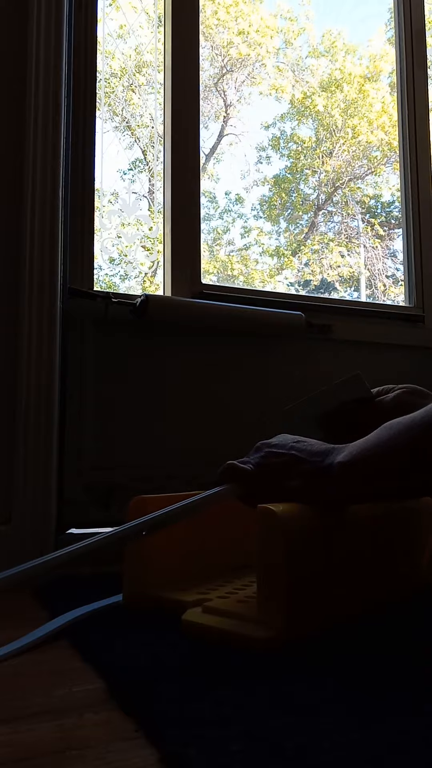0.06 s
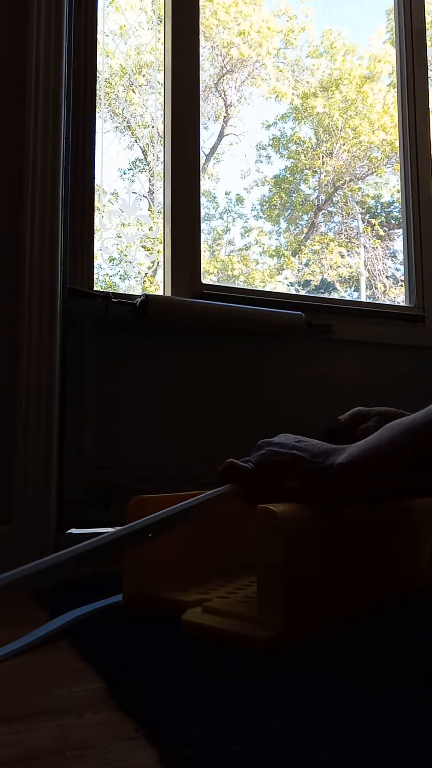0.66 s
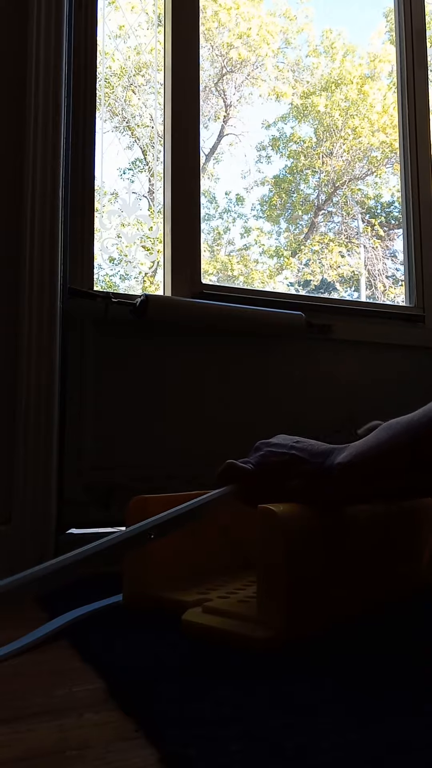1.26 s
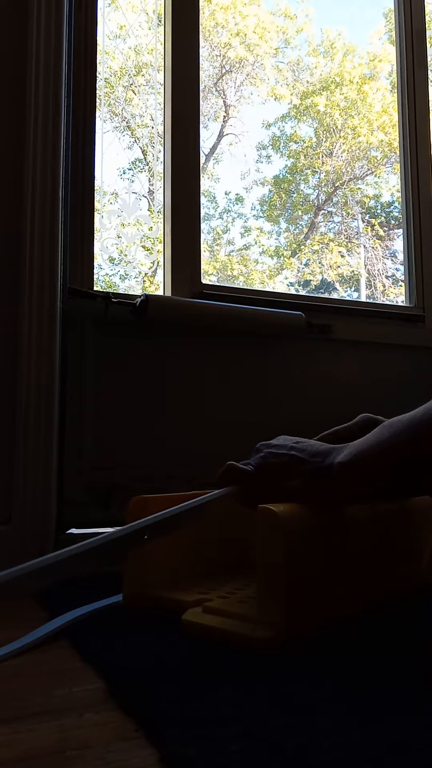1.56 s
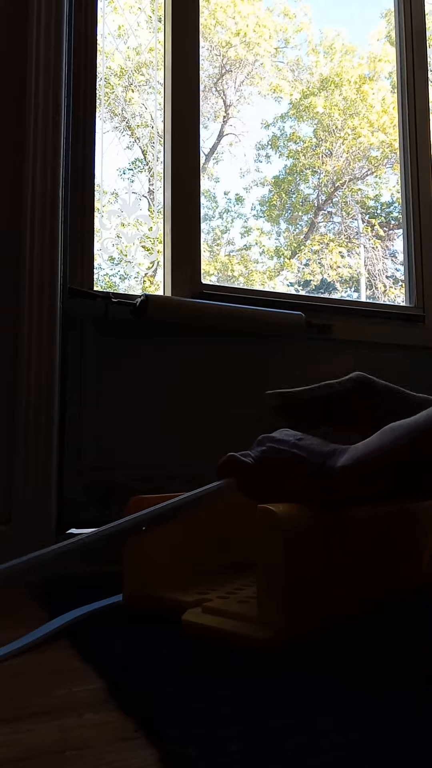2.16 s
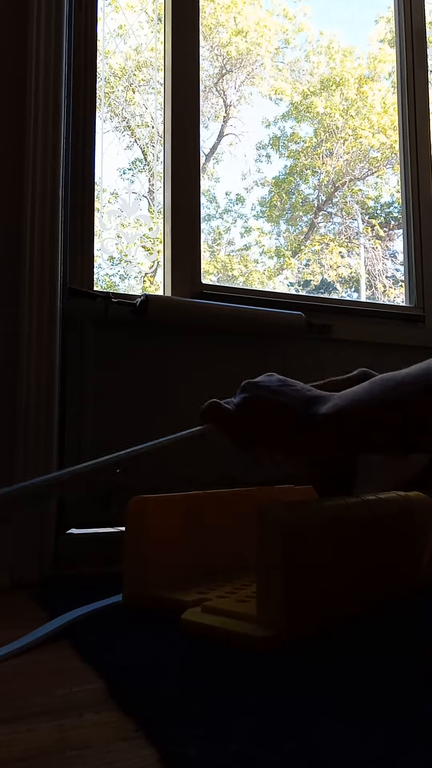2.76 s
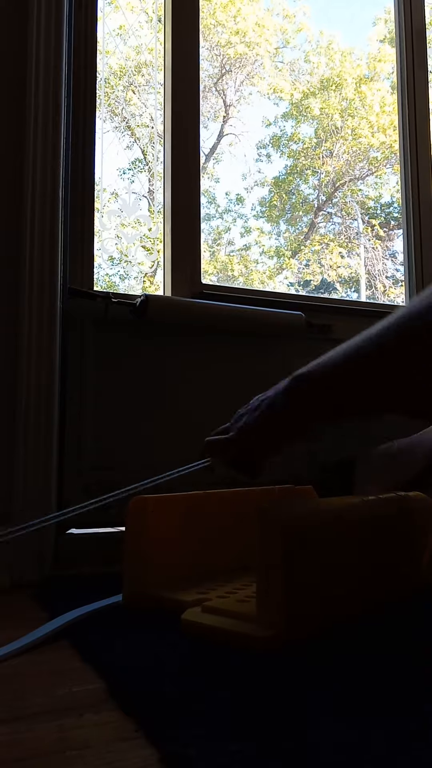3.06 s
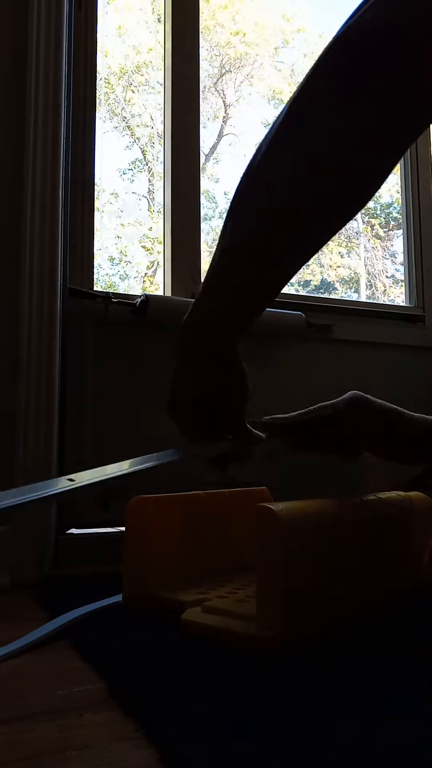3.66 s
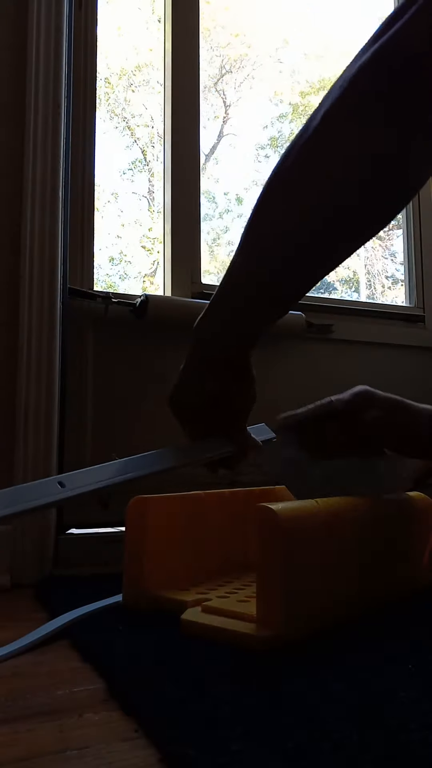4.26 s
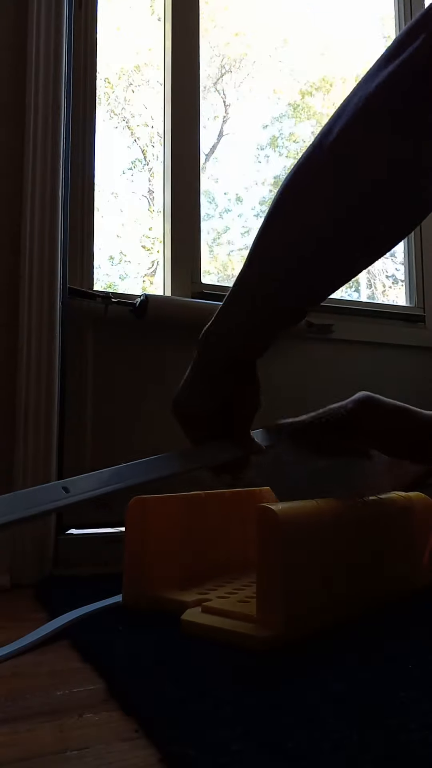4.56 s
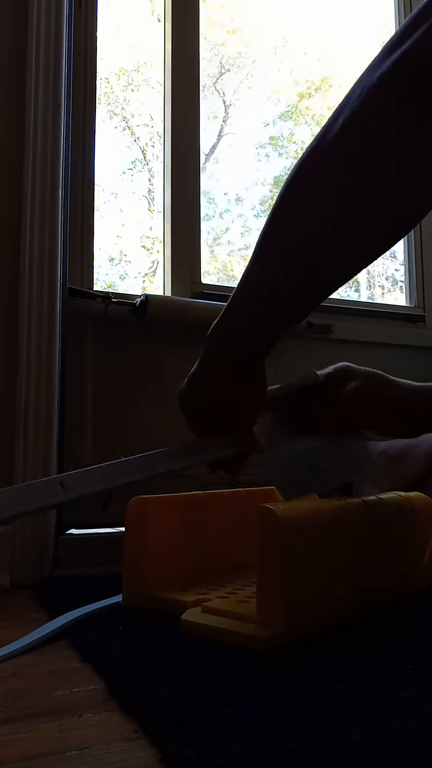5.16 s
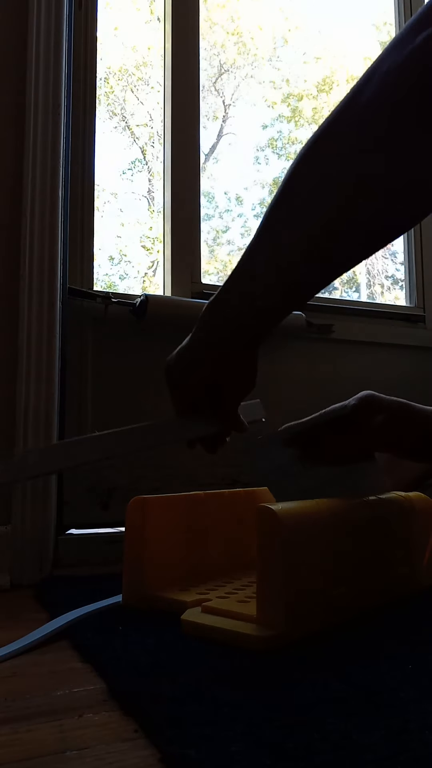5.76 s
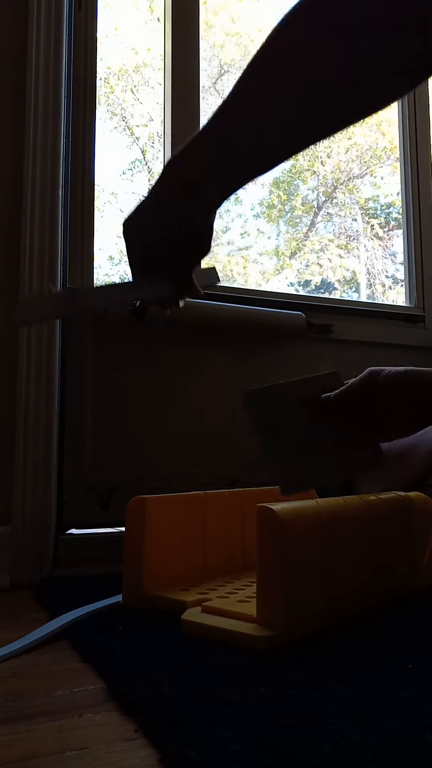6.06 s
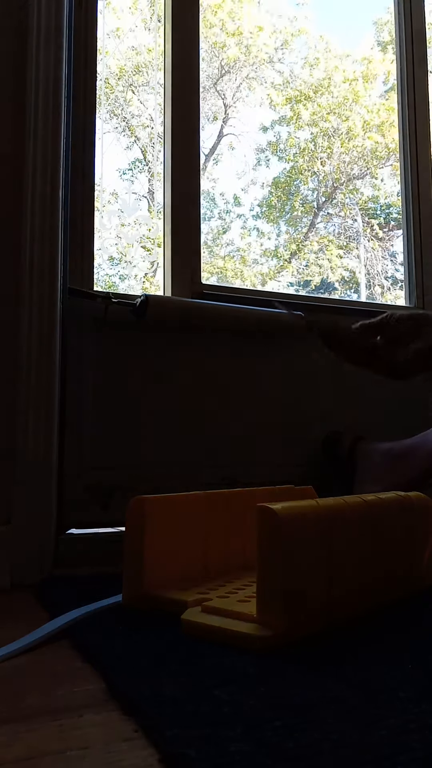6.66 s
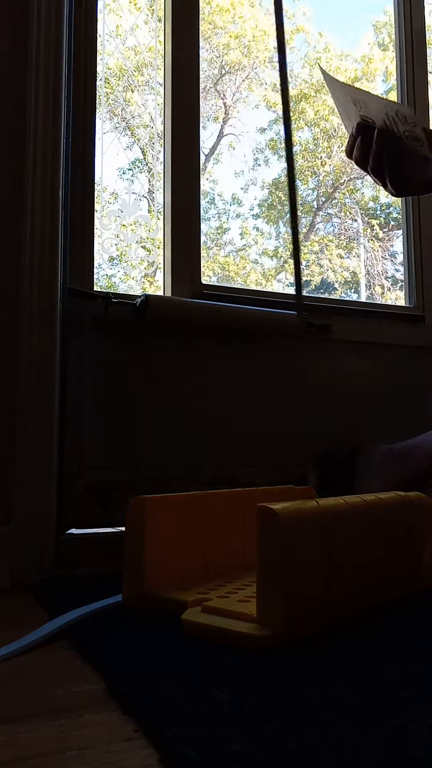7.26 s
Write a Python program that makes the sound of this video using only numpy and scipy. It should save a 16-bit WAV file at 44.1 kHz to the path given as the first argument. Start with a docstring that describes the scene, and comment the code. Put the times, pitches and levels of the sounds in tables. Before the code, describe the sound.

A small handsaw rasps through a plastic strip in short, halting strokes with knocks and squeaks, then one loud clack, indoors.

```python
"""A soft rub of hands and plastic, then a small saw works in short strokes on the end of a long plastic
strip, over a plastic miter box in a room at home. The blade lands with a chattering knock and its teeth
rasp; it binds and squeaks, and once slips free with a thin ring. The strip is lifted away and clacks
loudly against something hard. Bare walls answer, over the low murmur of the house."""
import sys
import numpy as np
from scipy import signal
from scipy.fft import rfft, irfft, next_fast_len
from scipy.io import wavfile
from scipy.ndimage import uniform_filter1d, map_coordinates

SR = 44100
rng = np.random.default_rng(int(sys.argv[2]) if len(sys.argv) > 2 else 0)


def transcribe(signal):
    """Save signal, clipped to [-1, 1], as a 16-bit WAV file at the path in sys.argv[1]."""
    frames = np.atleast_2d(signal).T
    limited = np.clip(frames, -1, 1)
    pcm = np.round(limited * 32767).astype(np.int16)
    wavfile.write(sys.argv[1], SR, pcm)


N = 326781


def amp(db):
    """Decibels to gain."""
    return 10 ** (np.asarray(db) / 20)


def unit(x):
    """Scale to rms 1."""
    return x / np.sqrt(np.mean(x ** 2) + 1e-20)


def along(points, hz):
    """Read a curve of (Hz, value) points on a log frequency axis."""
    f, v = np.transpose(points)
    return np.interp(np.log(hz + 1), np.log(f + 1), v)


def wobble(rate, size):
    """A smooth random curve, rate knots a second."""
    knots = rng.standard_normal(int(size * rate / SR) + 4)
    return map_coordinates(knots, [np.arange(size) * rate / SR])


def filtered(x, response):
    """Pass x through a frequency response."""
    n = x.shape[-1]
    m = 2 * next_fast_len(n // 2 + 4096)
    return irfft(rfft(x, m) * response(np.fft.rfftfreq(m, 1 / SR)), m)[..., :n]


def eq(points):
    """A minimum-phase EQ through (Hz, dB) points."""
    def response(hz):
        cepstrum = irfft(np.log(np.maximum(amp(along(points, hz)), 1e-4)))
        half = len(cepstrum) // 2
        cepstrum[1:half] *= 2
        cepstrum[half + 1:] = 0
        return np.exp(rfft(cepstrum))
    return response


def resonances(modes, f):
    """Response at f of a bank of modes, rolled off below the first and above the last."""
    low, high = f / (1.18 * modes[0][0]), f / (0.92 * modes[-1][0])
    highpass = low ** 2 / (1 - low ** 2 + 1j * np.sqrt(2) * low)
    lowpass = 1 / (1 - high ** 2 + 1j * np.sqrt(2) * high)
    peaks = sum((-1) ** k * amp(db) * 1j * f * width / (hz * hz - f * f + 1j * f * width)
                for k, (hz, width, db) in enumerate(modes))
    return highpass * lowpass * peaks


def add(track, s, sound):
    """Mix a sound into the track at s seconds."""
    part = track[max(round(s * SR), 0):][:len(sound)]
    part += sound[:len(part)]


def catches(size, rate, spread_db):
    """The grain of friction: tiny random impulses of uneven size, rate a second."""
    hits = rng.random(size) < rate / SR
    return hits * rng.standard_normal(size) * amp(spread_db * rng.standard_normal(size))


# Light slides. Each row: firmest moment, rise and fall in seconds, level in dB, hiss against rub in dB.
SLIDE_CUES = [(0.005, 0.046, .14, -38.5, -5.5), (0.125, .02, 0.16, -40, -15), (0.275, .03, .2, -37.5, -9.5),
              (0.359, 0.074, 0.045, -42.5, 6), (0.580, 0.064, 0.038, -41, 7), (1.820, .14, 0.22, -44, 4),
              (3.548, 0.16, .02, -47, -5), (4.000, 0.13, 0.24, -31.5, -3.5), (4.463, .02, .02, -36, -9),
              (4.835, 0.023, 0.08, -35.5, -6), (6.075, .09, 0.098, -36.5, -5.5),
              (6.270, .025, 0.095, -40.5, -17), (6.968, 0.064, 0.19, -51.5, -0.5),
              (7.190, 0.61, 0.21, -46.5, -10.5), (7.310, .12, 0.044, -46, -10)]
# The dull rub and its dry hiss. Each row: frequency in Hz, gain in dB.
RUB_EQ = [(30, -44), (76, -6), (120, -3.5), (190, 3), (290, -0.5), (450, -6.5), (800, -7.5), (1500, -25),
          (3000, -52)]
HISS_EQ = [(700, -18), (1500, 8.5), (2800, 3.5), (6000, -9), (9500, -19), (13000, -15), (16000, -23)]

def handling(fade_db=24):
    """Hands, blade and strip slide lightly: a lumpy rub and hiss that swell and fade."""
    out = np.zeros(N)
    for s, rise, fall, db, hiss_db in SLIDE_CUES:
        t = np.arange(max(s - rise, 0), s + fall, 1 / SR)
        touch_db = np.interp(t, [s - rise, s, s + fall], [-fade_db, 0, -fade_db])
        force = catches(len(t), rate=4000, spread_db=2) * amp(2 * wobble(40, len(t)))
        rub, hiss = unit(filtered(force, eq(RUB_EQ))), unit(filtered(force, eq(HISS_EQ)))
        add(out, t[0], amp(db + touch_db) * (rub + amp(hiss_db) * hiss))
    return out


# The bass-heavy bed under the scene. Each row: frequency in Hz, gain in dB.
HOUSE_EQ = [(15, -57), (25, -34), (48, -32), (62, -3.5), (112, -3), (125, -10), (139, -14), (415, -17),
            (475, -12), (729, -23.5), (5010, -34), (9520, -41.5), (13000, -35), (16000, -43)]

def house_tone(level_db=-51):
    """The quiet of the house: a steady, low murmur of noise."""
    left_right = filtered(rng.standard_normal((2, N)), eq(HOUSE_EQ))
    return amp(level_db) * spread(np.array([unit(noise) for noise in left_right]))


def patchy(x, depth_db=2.5):
    """Spectral peaks come and go as the point of contact travels."""
    spectrum = signal.stft(x, nperseg=256)[2]
    patches = uniform_filter1d(rng.standard_normal(spectrum.shape), size=3, axis=0)
    patches = uniform_filter1d(patches, size=9, axis=1)
    return signal.istft(spectrum * amp(depth_db * unit(patches)), nperseg=256)[1][:len(x)]


# Teeth tearing plastic, and the bright fizz of their tips. Each row: frequency in Hz, gain in dB.
RASP_EQ = [(820, -28), (1400, 0), (1680, 3), (1970, 1.5), (2150, 2.5), (2700, 0), (4610, -2.5),
           (5960, -6.5), (6780, -5.5), (7710, -8), (8250, -20), (8500, -18), (11000, -38.5), (18700, -120)]
FIZZ_EQ = [(5000, -29.5), (8500, -8.5), (10200, -8), (12600, 0), (14200, -5), (15400, -4), (16200, -9)]
# The strip's ring, its low bending thud, and the floor under the box.
# Each row: frequency in Hz, bandwidth in Hz, level in dB.
RING_MODES = [(578, 98, 0.5), (824, 110, -1), (985, 125, -5.5), (1375, 133, -4.5)]
THUD_MODES = [(178.2, 62.4, -2.5), (297.8, 45.8, -3.5), (434, 89, -6.5)]
FLOOR_MODES = [(78.6, 6.8, 0)]

def radiate(force, detune=0.073):
    """A contact force sounds as five layers, each at rms 1: rasp, fizz, ring, thud and floor boom."""
    grip = np.exp(detune * rng.standard_normal())  # the grip shifts the strip's modes a little
    def bodies(f):
        return np.array([eq(RASP_EQ)(f), eq(FIZZ_EQ)(f), resonances(RING_MODES, f * grip),
                         resonances(THUD_MODES, f * grip), resonances(FLOOR_MODES, f)])
    rasp, *others = filtered(force, bodies)
    return [unit(layer) for layer in [patchy(rasp), *others]]


# The blade lands, catches or stops. Each row: time in seconds, then level, hardness and weight in dB.
KNOCK_CUES = [(0.109, -53.5, -19, 12), (0.372, -42.5, 5, 6), (0.608, -40.5, 7.5, -3), (0.720, -35, 4, -10),
              (0.740, -34, 0, 5.5), (1.037, -36.5, -0.5, 7.5), (1.058, -32.5, 2, -10),
              (1.112, -46.5, 6, -4), (1.429, -55, 2, 15.5), (1.465, -46, 3, -7), (1.497, -28, 2, -0.5),
              (1.898, -32, 2.5, -1), (1.920, -29.5, -27, -5), (2.300, -32, -2, 2.5),
              (2.762, -35.5, 0.5, 1.5), (2.775, -34, -3.5, 2), (3.124, -39, 1, 3), (3.553, -36.5, -0.5, 1),
              (3.636, -37.5, 0, -7), (3.703, -35, -5, -9), (3.761, -30.5, 0.5, 0), (3.826, -41, 4.5, 12),
              (4.028, -28.5, -7, 1), (4.163, -25, -0.5, -3.5), (4.205, -33.5, 4.5, -0.5),
              (4.467, -31.5, -0.5, 4), (4.515, -43, 5, 0), (4.538, -30.5, -2, -2.5), (4.878, -34, 1, 2),
              (4.894, -31, -17, -3.5), (4.936, -42, 8.5, 8), (5.284, -32, 3, 2.5),
              (5.297, -30.5, -12.5, 1.5), (5.450, -33.5, -0.5, 1.5), (5.688, -37, 2, 2),
              (5.794, -30.5, -3.5, 0), (6.060, -43, -21, -2), (6.256, -60, -1, 8)]

def knocks(chatter_t60=0.1, impact=2.93, rise_s=0.0027, lifted_s=3.3):
    """The blade strikes and skitters: hard hits tick and fizz, heavy ones thud and shake the floor."""
    out, t = np.zeros(N), np.arange(SR // 5) / SR
    for s, db, hard_db, weight_db in KNOCK_CUES:
        force = catches(len(t), rate=3000, spread_db=3) * amp(-60 * t / chatter_t60)
        force[0] += impact
        tick, fizz, ring, thud, floor = radiate(force)
        floor_db = -17.5 if s > lifted_s else -12.5  # held above the box, the strip shakes it less
        treble = amp(hard_db) * (amp(-4) * tick + amp(-15.5) * fizz)
        bass = amp(weight_db) * (amp(-0.5) * thud + amp(floor_db) * floor)
        add(out, s, amp(db) * (1 - np.exp(-t / rise_s)) * (treble + ring + bass))
    return out


# Pushes and pulls of the saw. Each row: start, speed-up time and slow-down time in seconds,
# then level, opening swell, tooth-tip bite, strip ring and thud in dB.
STROKE_CUES = [ (0.372, 0.1, 0.058, -26, 13.5, 2, 1, 1), (0.606, .012, 0.048, -29.5, 5, -2.5, 2, 3),
               (0.720, 0.014, 0.031, -39, 3, -10, 14, 19), (1.146, 0.021, 0.12, -21.5, 3, 1, -1.5, -0.5),
               (1.520, .110, 0.061, -22.5, 12, -1, -1, -2),
               (1.920, 0.11, 0.055, -23.5, 12.5, -0.5, -3, -0.5), (2.325, 0.096, 0.084, -27, 2, 1, -0.5, 0),
               (2.790, 0.044, 0.12, -25, 1.5, 3, -0.5, 0.5),
               (3.121, .012, 0.047, -27, -10, -10, -8.5, -3.5),
               (3.582, 0.057, 0.022, -32, 1.5, 1.5, 3, 6.5), (3.707, 0.041, .034, -25, -1, 5.5, -3, -8),
               (3.780, 0.025, 0.033, -30.5, 7, -1, -3, 8), (4.085, 0.073, 0.015, -23, 10, 6.5, -3, -3.5),
               (4.540, 0.078, 0.051, -21, 10, 2.5, 0.5, 1),
               (4.955, 0.049, 0.068, -22.5, 2.5, 1.5, 0.5, 0.5), (5.360, 0.056, 0.052, -22, 2, 1.5, 1, 2),
               (5.688, 0.044, 0.072, -22.5, 5, 1, 2.5, 0.5), ]
# The mix of rasp, fizz, ring and thud. Each row: level at speed in dB, dB gained per dB of blade speed.
STROKE_MIX = [(-0.5, 1), (-7, 1.65), (-0.5, 0.65), (-6.5, 0.38)]

def sawing(rise_s=0.00093, release_s=0.004, slowing_db=10.5, chatter_db=1.4, pressure_db=0.5):
    """Teeth tear the plastic in dense, chattering catches; the treble follows the blade's speed most."""
    out, t = np.zeros(N), np.arange(SR // 3) / SR
    for s, speeding, slowing, db, swell_db, bite_db, ring_db, thud_db in STROKE_CUES:
        run_up, run_down = np.clip(1 - t / speeding, 0, 1), np.clip((t - speeding) / slowing, 0, 1)
        speed_db = -swell_db * run_up ** 2 - slowing_db * run_down ** 2
        contact = np.minimum(t / rise_s, 1) * np.exp(-np.maximum(t - speeding - slowing, 0) / release_s)
        force = catches(len(t), rate=6000, spread_db=2)
        force *= amp(chatter_db * wobble(315.6, len(t)) + pressure_db * wobble(56, len(t)))
        layers = zip(STROKE_MIX, [0, bite_db, ring_db, thud_db], radiate(force))
        sound = sum(amp(mix_db + trim_db + follow * speed_db) * layer
                    for (mix_db, follow), trim_db, layer in layers)
        add(out, s, amp(db) * contact * sound)
    return out


# The blade binds and the strip judders. Each row: start and length in seconds, pitch in Hz,
# level in dB, roughness from 0 (pure) to about 1 (a scrape).
SQUEAK_CUES = [(1.203, 0.056, 878, -22, 0.49), (1.252, 0.0095, 1207, -16.5, 1),
               (1.757, 0.037, 1107, -29.5, 0.85), (1.811, 0.036, 1048, -30, 0.7),
               (1.964, 0.015, 2226, -24, 0.45), (2.44, 0.043, 842, -25, 0.7),
               (2.905, 0.016, 836, -22.5, 0.14), (3.122, 0.0355, 741, -22, 0.068),
               (3.637, 0.0065, 1390, -19.5, 0.9), (3.637, 0.012, 934, -18.5, 0.6),
               (3.873, 0.0057, 304, -28, 0.2), (3.944, 0.021, 1015, -28, 0.96),
               (3.978, 0.017, 1027, -19, 0.97), (4.042, 0.02, 1250, -19.5, 1.32),
               (4.203, 0.053, 283.7, -23.5, 0.37), (4.466, 0.007, 818, -13.5, 0.5),
               (4.536, 0.0045, 3170, -21, 0.5)]

def squeaks(waver=0.17, rough_db=4.5, overtone_db=-26, ring_s=0.0045, rise_s=0.0032):
    """Stick and slip: a short tone, uneven in pitch and level, that rings out in the strip."""
    out, t = np.zeros(N), np.arange(SR // 6) / SR
    for s, length, hz, db, rough in SQUEAK_CUES:
        phase = 2 * np.pi * np.cumsum(hz * (1 + rough * waver * wobble(693, len(t)))) / SR
        grip = np.minimum(t / rise_s, 1) * np.exp(-np.maximum(t - length, 0) / ring_s)
        tone = np.sin(phase) + amp(overtone_db) * np.sin(2 * phase)
        judder = amp(rough * rough_db * wobble(528, len(t)))
        add(out, s, amp(db) * grip * unit(tone * judder))
    return out


# The blade slips free. Each row: start in seconds, pitch in Hz, level in dB, t60 in seconds.
TWANG_CUES = [(3.124, 738, -37.5, .72)]

def twang():
    """The freed steel blade rings on one thin note."""
    out, t = np.zeros(N), np.arange(SR) / SR
    for s, hz, db, t60 in TWANG_CUES:
        add(out, s, amp(db - 60 * t / t60) * np.sin(2 * np.pi * hz * t))
    return out


# Single teeth snagging. Each row: time in seconds, level in dB.
CLICK_CUES = [(3.704, -24), (4.029, -33), (4.063, -28), (4.468, -44), (4.513, -29), (4.878, -24.5),
              (5.285, -19.5), (5.687, -22), (6.013, -28.5), (6.275, -46.5), (6.422, -53)]

def tip_clicks(t60=0.011):
    """A steel tooth tip flicks free with a very short, very high click."""
    out, t = np.zeros(N), np.arange(SR // 10) / SR
    for s, db in CLICK_CUES:
        fizz = unit(filtered(rng.standard_normal(len(t)), eq(FIZZ_EQ)))
        add(out, s, amp(db - 60 * t / t60) * fizz)
    return out


# The last blow and its rebound. Each row: time in seconds, level in dB.
CLACK_CUES = [(7.3276, -1), (7.3398, -8)]
# The strip struck on its end. Each row: frequency in Hz, level in dB, t60 in seconds.
END_MODES = [(715, -20, 0.076), (967, -2, 0.067), (1120, -3, 0.04), (1390, -19, 0.088),
             (2576, -14.5, 0.045), (3500, -17, 0.027), (5700, -20.5, 0.03), (8840, -24, .05)]

def clack(crack_db=-14, crack_t60=0.27, rise_s=0.0008):
    """The strip's end hits something hard: a hollow ring and a noisy crack."""
    out, t = np.zeros(N), np.arange(SR // 5) / SR
    crack_eq = eq([(120, -4), (500, -5), (1100, 11), (1800, -8.5), (4000, -11), (9000, -17.5),
                   (16000, -22)])
    for s, db in CLACK_CUES:
        ring = sum(amp(level - 60 * t / t60) * np.sin(2 * np.pi * hz * t) for hz, level, t60 in END_MODES)
        crack = amp(crack_db - 60 * t / crack_t60) * unit(filtered(rng.standard_normal(len(t)), crack_eq))
        add(out, s, amp(db) * (1 - np.exp(-t / rise_s)) * (ring + crack))
    return out


# Stereo width of reflections and house tone. Each row: frequency in Hz, side against mid in dB.
SIDE_EQ = [(100, -9), (350, -12.5), (650, -3), (1100, 2.5), (16000, -1.5)]

def spread(pair):
    """Two unrelated signals become mid and side: narrow bass, wide treble."""
    mid, side = filtered(pair, lambda hz: np.array([np.ones_like(hz), amp(along(SIDE_EQ, hz))]))
    return np.array([mid + side, mid - side])


# Bright scatter off box and sill, then the walls' colour. Each row: frequency in Hz, gain in dB.
SCATTER_EQ = [(200, -8.5), (700, -4.5), (1400, -0.5), (16000, 4.5)]
TAIL_EQ = [(100, -2.5), (250, 1.5), (800, -4.5), (2500, 0.5), (7000, 1), (10000, 5), (16000, -7.5)]
# How long the bare walls ring. Each row: frequency in Hz, t60 in seconds.
WALL_DECAY = [(80, 0.27), (250, 0.66), (800, 0.57), (2500, 0.62), (6500, 0.58), (10000, 0.4), (16000, 0.46)]

def room(x, early_db=-1, tail_db=-5, early_t60=0.031, early_mid_db=-4, build_s=0.0076, changes=24):
    """Direct sound, near scatter and the walls' answer; echo paths change as hands and strip move."""
    size, hop = SR * 3 // 5, N // changes + 1
    m = 2 * next_fast_len(size // 2 + hop + 2048)
    f = np.fft.rfftfreq(m, 1 / SR)
    scatter = eq(SCATTER_EQ)(f) * amp([[early_mid_db + early_db], [early_db]])
    walls = eq(TAIL_EQ)(f) * amp(tail_db)
    padded, wet = np.pad(x, (hop, 2 * hop)), np.zeros((2, N + 2 * hop + m))
    for start in np.arange(changes + 2) * hop:  # each crossfaded piece gets fresh echoes
        hz, t, noise = signal.stft(rng.standard_normal((2, size)), SR, nperseg=256)
        envelope = amp(-60 * t / along(WALL_DECAY, hz)[:, None]) * (1 - np.exp(-t / build_s))
        tail = signal.istft(noise * envelope, SR, nperseg=256)[1]
        early = rng.standard_normal((2, size // 8)) * amp(-60 * np.arange(size // 8) / SR / early_t60)
        paths = scatter * rfft(early / np.linalg.norm(early[0]), m)
        paths += walls * rfft(tail / np.linalg.norm(tail[0]), m)
        piece = padded[start:start + 2 * hop]
        fade = np.sin(np.pi * np.arange(len(piece)) / (2 * hop))
        wet[:, start:start + m] += irfft(rfft(piece * fade, m) * paths, m)[:, :wet.shape[1] - start]
    return x + spread(wet[:, hop:hop + N])


def scene():
    """Saw and strip up close, a little to the right, over the quiet of the house."""
    work = room(sawing() + knocks() + tip_clicks() + handling() + squeaks() + clack())
    return (work + twang() + house_tone()) * amp([[-0.8], [0.8]])


def record(dry, top_hz=16000):
    """Clip at full scale, then cut the highest treble."""
    return filtered(np.clip(dry, -1, 1), lambda hz: hz < top_hz)


dry = scene()
out = record(dry)
transcribe(out)
```